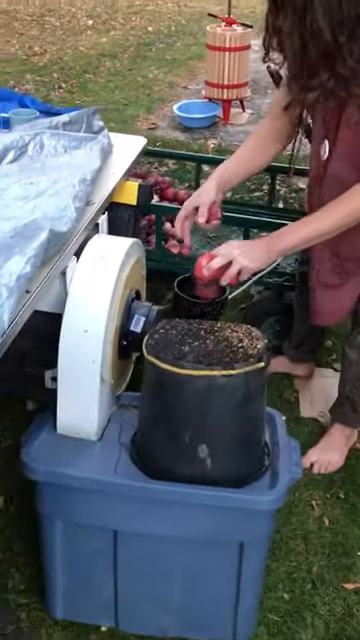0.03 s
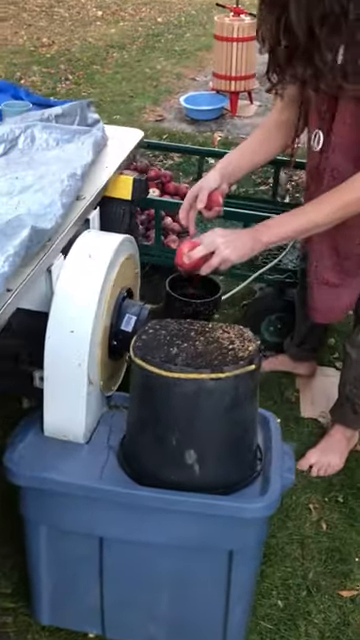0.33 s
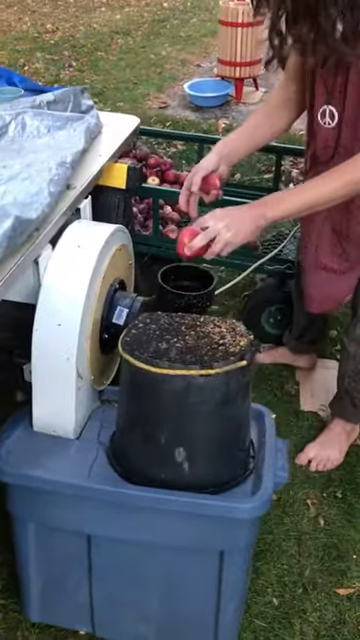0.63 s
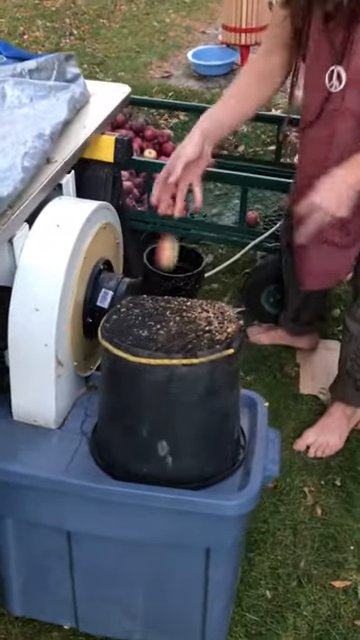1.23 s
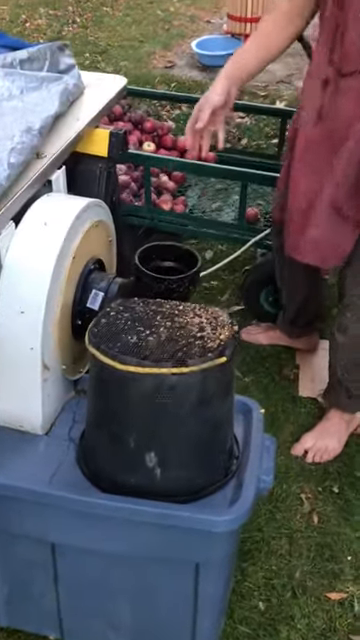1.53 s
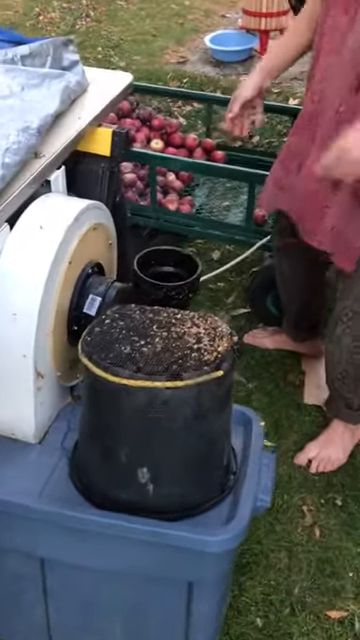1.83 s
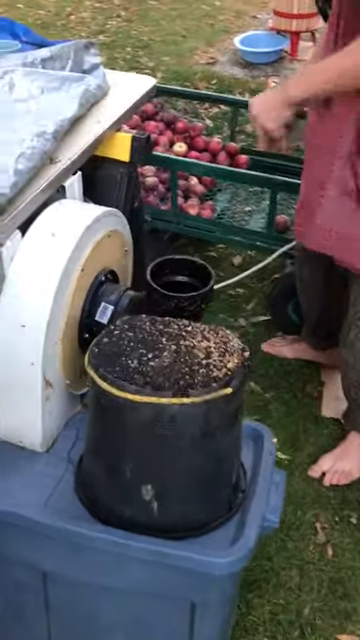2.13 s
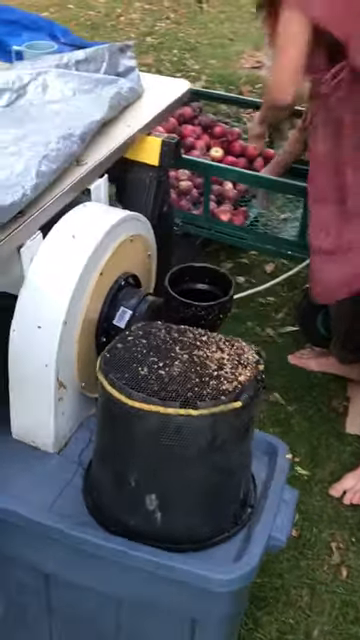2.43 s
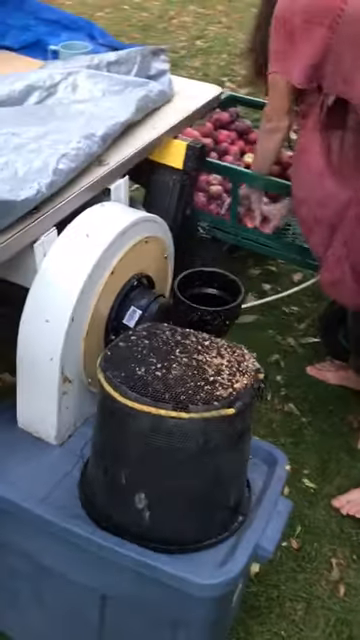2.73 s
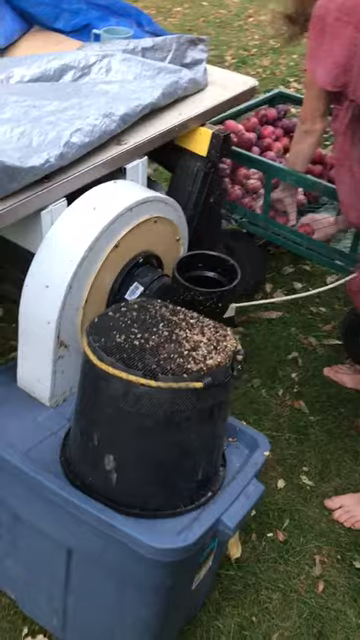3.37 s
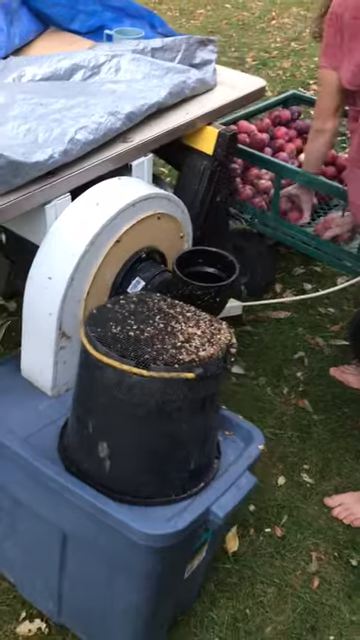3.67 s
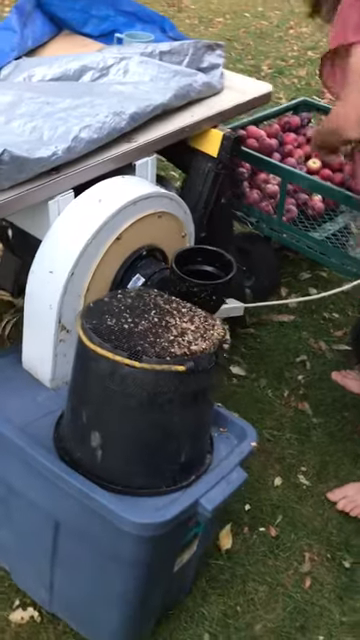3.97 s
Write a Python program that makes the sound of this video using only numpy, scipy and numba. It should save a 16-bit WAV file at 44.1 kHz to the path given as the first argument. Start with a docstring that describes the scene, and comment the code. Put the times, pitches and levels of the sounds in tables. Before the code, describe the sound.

An electric apple grinder whirs outdoors. Apples skip on its teeth and are shredded in about five short, crackling bursts, each with a falling hollow note. Then the drum runs empty, and the whir swells back with a steady whine.

```python
"""First comes the whir of an electric apple grinder outdoors: a toothed drum in a plastic housing.
Apples skip on the teeth, then are seized and shredded in short bursts, each with a falling hollow note.
A limiter (an automatic volume control) turns the whir down at every burst. Once the drum runs empty,
the whir swells back, and the hum of the drum and the whine of its teeth stand out."""
import sys
import numpy as np
from scipy import signal
from scipy.fft import rfft, irfft, next_fast_len
from scipy.io import wavfile
from scipy.ndimage import uniform_filter1d, minimum_filter1d, map_coordinates
from numba import njit

SR = 44100
rng = np.random.default_rng(int(sys.argv[2]) if len(sys.argv) > 2 else 0)


def transcribe(u):
    """Save the signal u as a 16-bit wav file named by the first command-line argument.

    u: samples, shape (n,) or (channels, n), limited to [-1, 1]; the rate is SR.
    q: integer samples, one column per channel.
    """
    v = np.clip(np.atleast_2d(u).T, -1, 1)
    q = np.round(v * 32767).astype(np.int16)
    wavfile.write(sys.argv[1], SR, q)


N = 176400  # 4 seconds

# Apples seized by the drum, each with a hollow note: (time [s], length [s], relative level [dB],
# note start [Hz], note end [Hz], glide time [s], note level relative to the bite [dB])
BITES = [(.115, 0.041, -1.5, 2980, 673, 0.0227, -3.5), (.496, 0.035, -2, 3060, 1360, 0.025, -0.5),
         (.718, 0.026, 1, 3000, 792, 0.0126, 2.5), (1.319, 0.032, -3, 5630, 1740, 0.0087, 2),
         (1.549, 0.025, -1.5, 2960, 1070, .012, -1.5)]
# Apples and scraps glancing off the teeth: (time [s], relative level [dB], rise [s], decay [s])
NICKS = [(0.06, -19.5, 0.0039, 0.069), (0.094, -13, 0.0075, .025), (0.188, -6, 0.02, 0.016),
         (.295, -31, .002, .008), (.473, -6.5, 0.0026, 0.027), (.578, -14, .005, .015),
         (0.595, -7.5, 0.0095, 0.0099), (.667, -16, .005, .010), (.693, -13.5, 0.013, 0.03),
         (.851, -4.5, 0.0026, 0.0091), (1.276, -16, 0.0046, 0.058), (1.298, -13, .010, 0.016),
         (1.38, -12, .003, 0.013), (1.413, -18, 0.011, 0.043), (1.468, -12.5, 0.014, 0.051),
         (1.503, -16, 0.0061, 0.037), (1.531, -13, 0.0035, 0.025), (1.581, 0, 0.009, 0.019),
         (1.619, -7, .003, 0.0084), (1.645, -14, 0.012, 0.025)]
# Tone colour of tearing fruit: (frequency [Hz], relative level [dB])
FLESH_SPECTRUM = [(200, -19), (900, -27), (1300, -4), (1650, 0), (2500, -4), (3200, -4.5), (4200, -5),
                  (6500, -8.5), (9000, -9), (10300, -13.5), (11500, -10), (15500, -17)]
# Tone colour of the air churned by the drum: (frequency [Hz], relative level [dB])
WHIR_SPECTRUM = [(15, -54), (25, -41), (43, -22), (64, -9.5), (86, -14.5), (129, -0.5), (240, -13.5),
                 (389, -13.5), (482, -4), (631, -8), (684, -5), (741, -10.5), (848, -10.5), (970, -8.5),
                 (1300, -13.5), (1850, -14), (2170, -20.5), (2560, -17.5), (3000, -22), (3830, -20.5),
                 (5010, -26), (6550, -26.5), (10600, -34.5), (12500, -35.5), (15500, -39)]
# Loudness of that whir: (time [s], level [dB])
WHIR_LEVEL = [(0, -22.5), (1.2, -23), (1.8, -22.5), (2.3, -22.5), (3.1, -22), (4, -22.5)]
# Extra treble in the whir: (time [s], boost [dB])
WHIR_TREBLE = [(0, 0), (2.3, 2.5), (4, 1)]
# Air booming in the housing: (time [s], level [dB])
BOOM_LEVEL = [(0, -39), (1.2, -38.5), (1.8, -33.5), (2.7, -43.5), (3.4, -29), (4, -36)]
# Whine of the teeth, strongest once the drum is empty: (time [s], level [dB])
WHINE_LEVEL = [(0, -47), (1.8, -47), (2.3, -26), (2.75, -24.5), (3.15, -30), (3.7, -22), (4, -23)]
# Pitches at which the chute and housing ring: (frequency [Hz], width [Hz], relative gain [dB])
HOUSING_RESONANCES = [(577, 40, 0.5), (778, 44, 3.5), (1120, 66, 5.5), (1640, 110, -2.5), (1850, 42, 5),
                      (2380, 76, 2), (2580, 65, 2.5), (2840, 120, 2), (3710, 110, 6), (3890, 66, -2.5),
                      (5160, 60, -4), (5920, 82, 4)]

FRUIT_DB, BITE_SAG_DB_PER_S = -4, 64
NOTE_Q, NOTE_EVENNESS = 6.0, 0.81  # how narrow the note is; share of its random swell evened out
DRUM_HZ, TOOTH_ROWS, SPEED_SWAY = 57.84, 12, 0.00304  # DRUM_HZ is turns a second
BOOM_HZ, BOOM_WIDTH_HZ, HUM_BELOW_WHINE_DB = 141.7, 31.5, 12.5
SQUEAK_HZ, SQUEAK_DB = 5630, -27
ECHO_DB, ECHO_FADE_S = -6.5, 0.056  # the echoes fade by 60 dB in this time
LIMIT_DB, START_DUCK_DB, TOP_HZ = -2, 6.0, 15830
HOLD_S, RELEASE_S, RELEASE_DB_PER_S = 0.13, 0.43, 13.5


def apple_bites():
    """The teeth rasp through each apple; as it vanishes, the cavity opens and its hollow note falls."""
    t = np.arange(N) / SR
    bite_gain, note_gain = np.zeros(N), np.zeros(N)
    note_hz = np.full(N, float(BITES[0][3]))
    for start, length, db, from_hz, to_hz, glide, note_db in BITES:
        sag_db = BITE_SAG_DB_PER_S * np.clip(t - start, 0, length)
        bite_gain += amp(db - sag_db) * envelope(start, length, rise=0.0078, decay=0.026)
        note_gain += amp(db + note_db) * envelope(start, length, rise=0.022, decay=0.012)
        glide_left = np.exp(-((t - start) / glide) ** 2)
        note_hz = np.where(t >= start, to_hz * (from_hz / to_hz) ** glide_left, note_hz)
    rasp = echoes(bite_gain * tearing())
    ring = moving_resonance(rng.standard_normal(N), 2 * np.pi * note_hz / SR, NOTE_Q)
    swell = np.abs(signal.hilbert(ring)) + 1e-6  # how strong the ring is at each moment
    note = note_gain * unit(ring / swell ** NOTE_EVENNESS)
    return housing(rasp + note, ring_db=-1)


def apple_nicks():
    """Fruit skips on the teeth: each nick tears a little flesh and knocks the housing."""
    power = sum((amp(db) * envelope(start, rise, rise, decay)) ** 2 for start, db, rise, decay in NICKS)
    return housing(echoes(np.sqrt(power) * tearing()), ring_db=0)


def tearing():
    """Fruit cells burst under the teeth: a dense crackle that comes in clumps."""
    noise = rng.standard_normal(N)
    crackle_db = 3 * wobble(rate=2200)
    clump_db = 2.3 * wobble(rate=300)
    return colour(noise * amp(crackle_db + clump_db), FLESH_SPECTRUM)


def air_whir():
    """The spinning drum churns the air, which faintly rings the housing."""
    air = unit(housing(colour(rng.standard_normal(N), WHIR_SPECTRUM), ring_db=-17))
    treble = filtered(air, lambda f: f * f / (f * f + 2500 ** 2))
    air += (amp(curve(WHIR_TREBLE)) - 1) * treble
    return air * amp(curve(WHIR_LEVEL) + 0.19 * wobble(rate=60))


def drum_tones():
    """The drum hums with one wave per turn and whines with one wave per row of teeth."""
    speed_hz = DRUM_HZ * (1 + SPEED_SWAY * wobble(rate=7))
    angle = 2 * np.pi * np.cumsum(speed_hz) / SR
    level_db = curve(WHINE_LEVEL)
    whine = amp(level_db + 0.5 * wobble(rate=24)) * np.sin(TOOTH_ROWS * angle)
    hum = amp(level_db - HUM_BELOW_WHINE_DB + 0.94 * wobble(rate=5.5)) * np.sin(angle)
    return whine + hum


def air_boom():
    """Air booms in the housing: a narrow band of low noise."""
    boom = filtered(rng.standard_normal(N), lambda f: resonance(f, BOOM_HZ, BOOM_WIDTH_HZ) ** 2)
    return amp(curve(BOOM_LEVEL)) * unit(boom)


def peel_squeak():
    """The first apple's wet peel slips on the drum and squeaks before the teeth catch it."""
    pitch_hz = SQUEAK_HZ * (1 + 0.013 * wobble(rate=500))
    tone = np.sin(2 * np.pi * np.cumsum(pitch_hz) / SR)
    return amp(SQUEAK_DB) * envelope(start=0.064, length=0.023, rise=0.002, decay=0.004) * tone


def housing(x, ring_db):
    """Sound passes straight out and also makes the housing ring."""
    def ringing(f):
        return sum(amp(db) * resonance(f, hz, width) for hz, width, db in HOUSING_RESONANCES)
    return filtered(x, lambda f: 1 + amp(ring_db) * ringing(f))


def echoes(x):
    """The direct sound plus quick reflections in the chute and off the gear around it."""
    t = np.arange(SR // 5) / SR
    tail = rng.standard_normal(len(t)) * amp(-60 * t / ECHO_FADE_S)
    return x + amp(ECHO_DB) * signal.fftconvolve(x, tail / np.linalg.norm(tail))[:N]


def amp(db):
    """Turn decibels into a multiplier."""
    return 10 ** (np.asarray(db) / 20)


def unit(x):
    """Scale to an average strength (rms) of 1."""
    return x / np.sqrt(np.mean(x ** 2) + 1e-20)


def curve(rows):
    """Join (time, value) rows with straight lines, one value per sample."""
    return np.interp(np.arange(N) / SR, *np.transpose(rows))


def wobble(rate):
    """A smooth curve through `rate` random values a second."""
    return map_coordinates(rng.standard_normal(N // 8), [np.arange(N) * rate / SR], mode="wrap")


def envelope(start, length, rise, decay):
    """Rise in a straight line, hold until `length` after the start, then die away (all in seconds)."""
    t = np.arange(N) / SR - start
    return np.clip(t / rise, 0, 1) * np.exp(-np.maximum(t - length, 0) / decay)


def filtered(x, response):
    """Multiply each frequency f in x by response(f)."""
    size = next_fast_len(N + SR // 2)
    return irfft(rfft(x, size) * response(np.fft.rfftfreq(size, 1 / SR)), size)[:N]


def colour(x, points):
    """Give x the tone colour of (frequency, level) points, at strength 1."""
    hz, db = np.transpose(points)
    return unit(filtered(x, lambda f: amp(np.interp(np.log(f + 1), np.log(hz + 1), db))))


def resonance(f, hz, width_hz):
    """Response of something that rings at `hz`: 1 there, weaker on either side."""
    return 1j * f * width_hz / (hz * hz - f * f + 1j * f * width_hz)


@njit
def moving_resonance(x, pitch, q):
    """Ring at a moving pitch (radians per sample); noise fed in keeps a steady level."""
    y, state = np.zeros(len(x)), 0j
    for i in range(len(x)):
        loss = pitch[i] / (2 * q)
        state = state * np.exp(-loss + 1j * pitch[i]) + 2 * np.sqrt(loss) * x[i]
        y[i] = state.real
    return y


@njit
def ducking(excess_db):
    """How many dB to turn down: jumps to meet any peak over the limit, waits, then creeps back."""
    duck_db, now, wait = np.zeros(len(excess_db)), START_DUCK_DB, 0.
    for i in range(len(excess_db)):
        wait -= 1
        if wait < 0:
            now = max(now * (1 - 1 / (RELEASE_S * SR)) - RELEASE_DB_PER_S / SR, 0.)
        if excess_db[i] > now:
            now, wait = excess_db[i], HOLD_S * SR
        duck_db[i] = now
    return duck_db


def scene():
    """The fruit and the running machine, in one channel."""
    fruit = amp(FRUIT_DB) * (apple_bites() + apple_nicks()) + peel_squeak()
    machine = air_whir() + drum_tones() + air_boom()
    return (fruit + machine)[None]


def record(dry):
    """A limiter turns loud peaks down fast and recovers slowly; then the highest treble is cut."""
    window = SR // 1000  # about 1 ms
    headroom_db = LIMIT_DB - 20 * np.log10(np.abs(dry[0]) + 1e-9)
    duck_db = ducking(-minimum_filter1d(headroom_db, window))
    limited = dry[0] * amp(-uniform_filter1d(duck_db, window))
    return filtered(limited, lambda f: f < TOP_HZ)[None]


dry = scene()
out = record(dry)
transcribe(out)
```